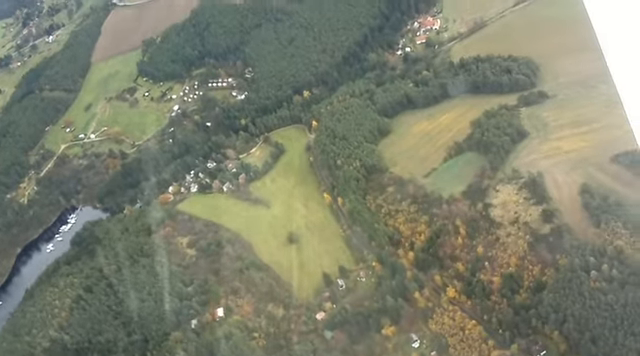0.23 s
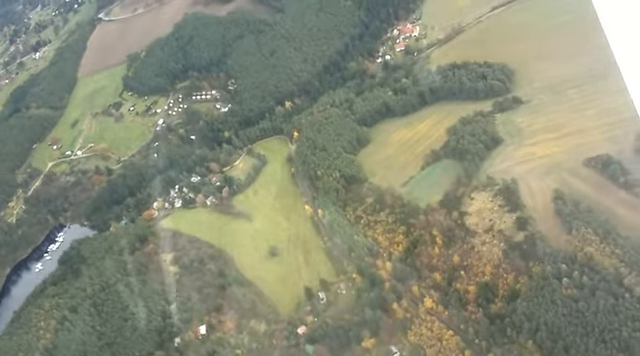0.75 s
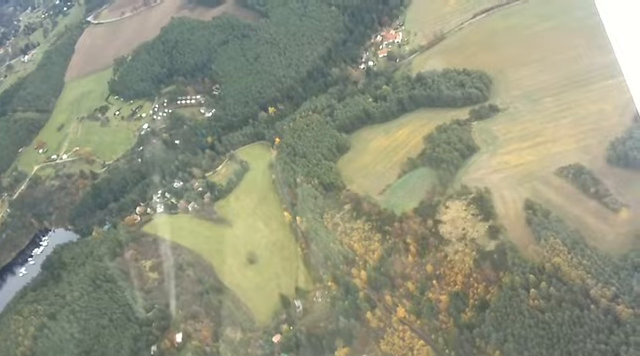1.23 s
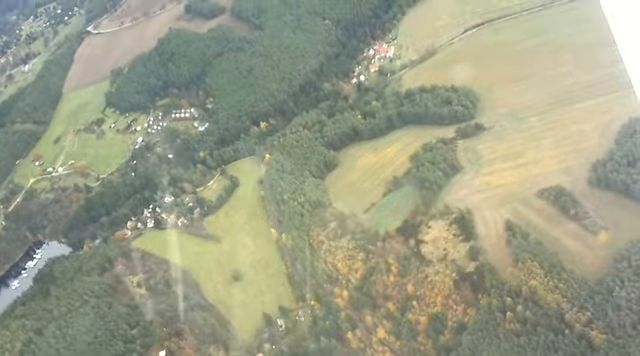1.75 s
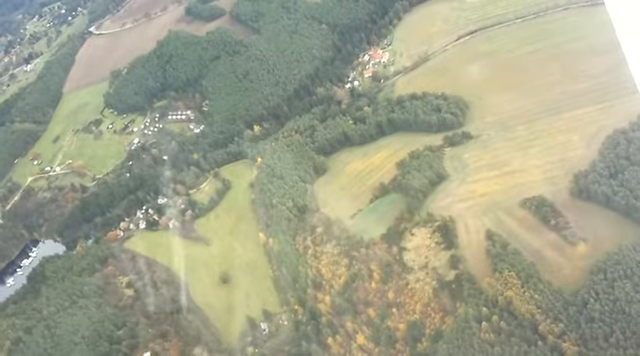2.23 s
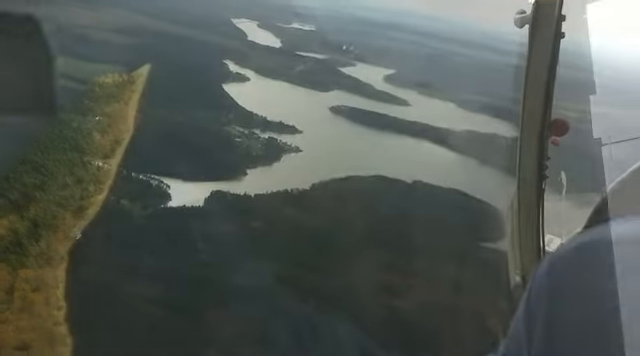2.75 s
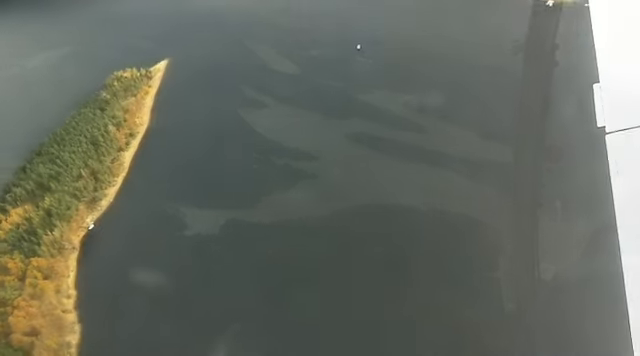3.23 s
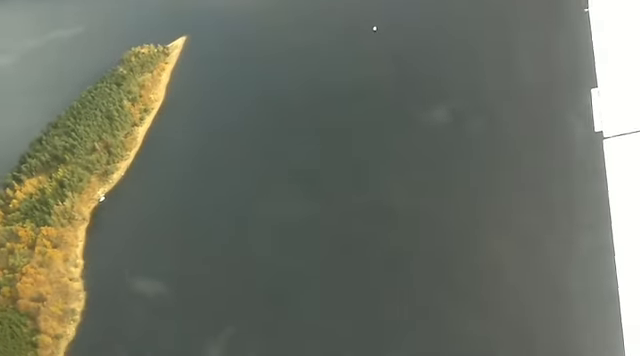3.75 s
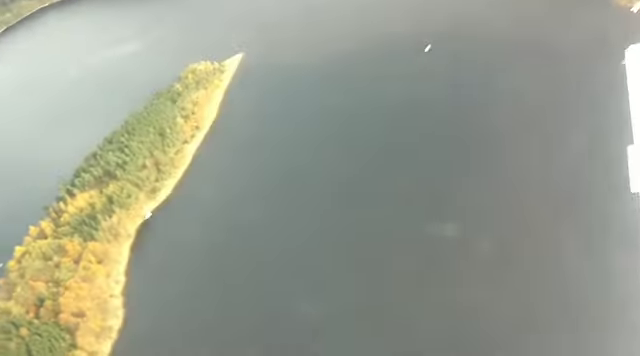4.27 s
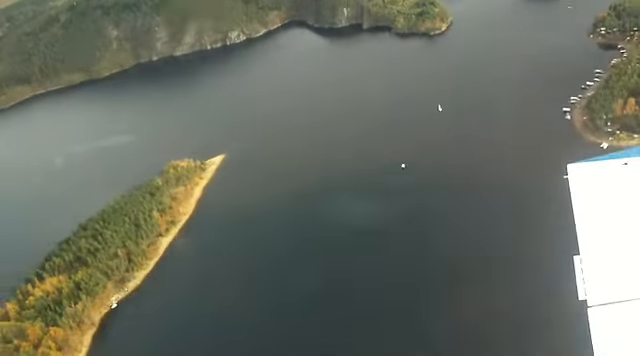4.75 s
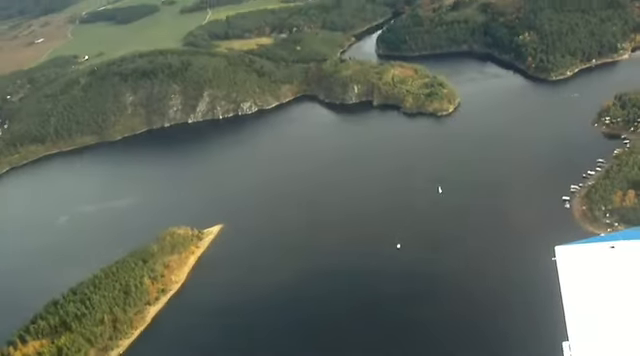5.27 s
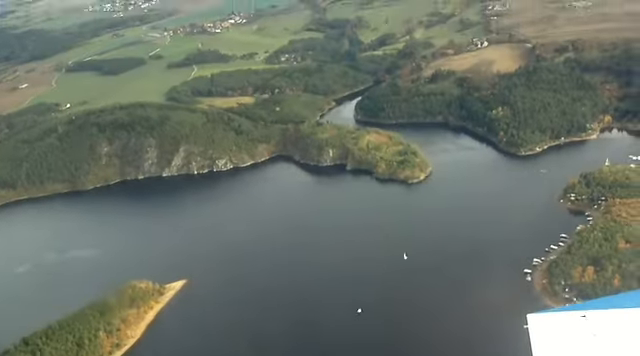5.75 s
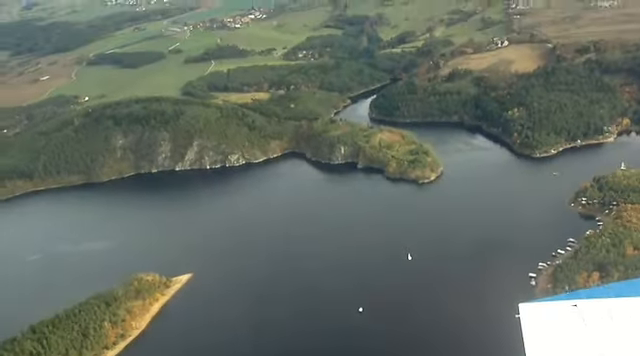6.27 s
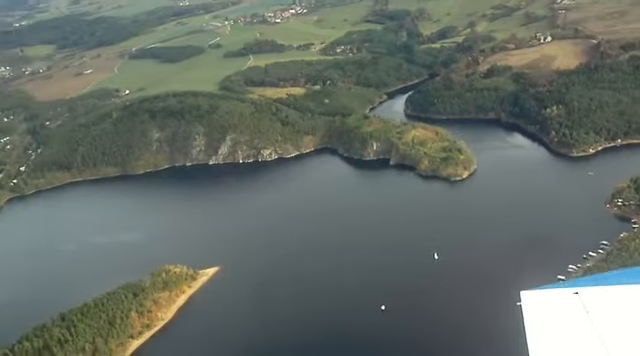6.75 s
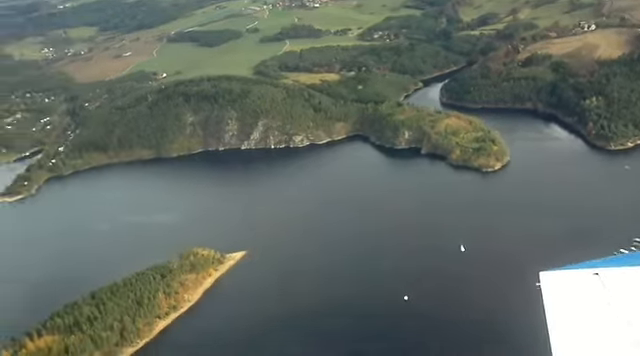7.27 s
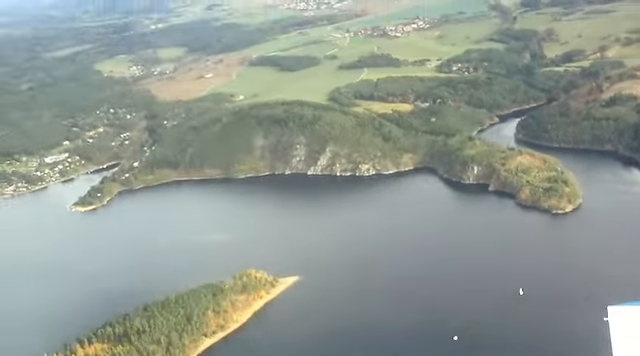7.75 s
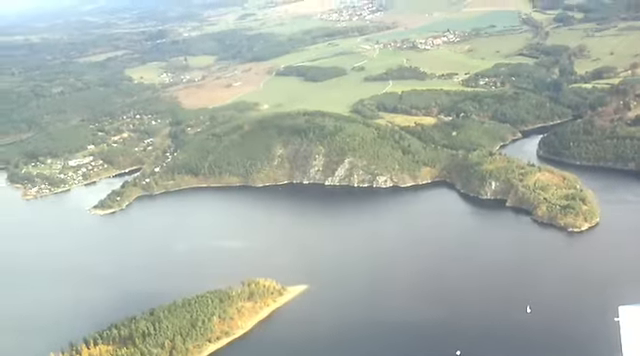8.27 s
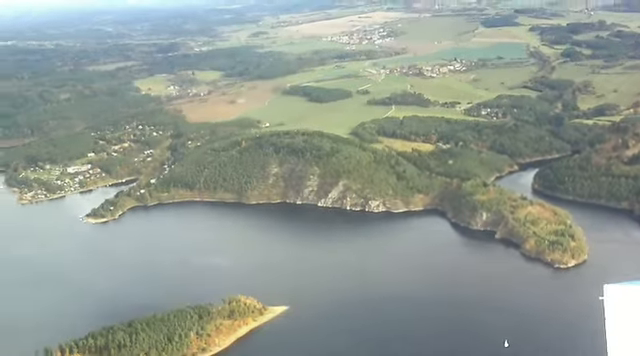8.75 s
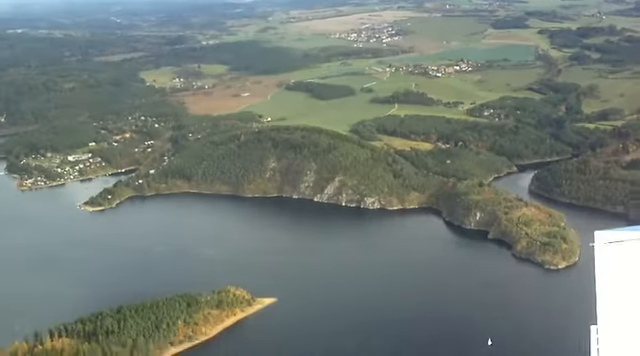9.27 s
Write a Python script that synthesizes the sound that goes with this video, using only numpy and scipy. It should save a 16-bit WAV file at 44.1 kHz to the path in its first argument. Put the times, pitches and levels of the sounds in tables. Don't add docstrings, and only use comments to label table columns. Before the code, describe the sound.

Inside a small piston aircraft in cruise, a firm low engine hum sits over airframe rumble and rushing slipstream. At about two and a third seconds it cuts off sharply. After a brief near-silent gap, scrapes and a dull knock on the camera open a short, brighter burst that fades while the steady drone swells back. The air rush then brightens, finally dulling. Close, slightly overdriven small microphone.

```python
import sys
import numpy as np
from scipy import signal
from scipy.fft import rfft, irfft, next_fast_len
from scipy.io import wavfile
from scipy.ndimage import uniform_filter1d, minimum_filter1d

SR = 44100
rng = np.random.default_rng(int(sys.argv[2]) if len(sys.argv) > 2 else 0)


def inscribe(sig):
    pcm = np.round(np.clip(np.atleast_2d(sig).T, -1, 1) * 32767)
    wavfile.write(sys.argv[1], SR, pcm.astype(np.int16))


def volts_from_db(level):
    exponent = np.asarray(level, float) / 20
    return 10 ** exponent


N = 419391
TIME = np.arange(N) / SR
CUT_S, INSERT_S, FADE_IN_S, FADE_OUT_S = 2.3635, 2.5585, 0.86, 0.57
SMEAR_S = 0.019

SPEED_LATER = [(3.1, 121.7), (9.5, 121.5)]


def unit(x):
    return x / np.sqrt(np.mean(x ** 2))


def walk(rate_hz):
    hold = max(int(SR / 32 / rate_hz), 1)
    ticks = N // 32 + 2
    held = np.repeat(rng.standard_normal(ticks // hold + 1), hold)
    slewed = uniform_filter1d(uniform_filter1d(held, hold), hold)[:ticks]
    return np.interp(TIME, np.arange(ticks) * 32 / SR, unit(slewed))


def coloured(points):
    size = next_fast_len(N)
    hz = np.arange(1, size // 2 + 2) * SR / size
    points_hz, points_db = np.transpose(points)
    shape = volts_from_db(np.interp(np.log(hz), np.log(points_hz), points_db, left=-90, right=-90))
    lines = rfft(rng.standard_normal(size)) * shape
    return hz, lines / np.sqrt(np.mean(shape ** 2))


def bands(points, edges_hz):
    hz, lines = coloured(points)
    for row in np.eye(len(edges_hz)):
        weight = np.interp(np.log(hz), np.log(edges_hz), row)
        yield irfft(lines * weight, next_fast_len(N))[:N]


def engine(cycle_rad, orders, lag_rad):
    out = 0
    twist_rad = 0.29 * walk(1.5)
    for k, db in orders:
        loose = {6: 0.08, 16: 0.5}.get(k, 1)
        start_rad = lag_rad + np.pi * (k < 6) + (k - 6) * twist_rad
        level = np.sqrt(2) * volts_from_db(db + 2.16 * loose * walk(4.0))
        out = out + level * np.sin(k * cycle_rad + start_rad + 0.59 * loose * walk(3.5))
    return out


def slipstream(cycle_rad, colour, facing):
    throb_orders = [(1, .02), (2, .035), (3, .035), (6, .04)]
    # band_hz, gain_db
    canopy = [(1500, 1.14), (3600, 3.5), (5200, 0.7), (6800, 1.1), (8600, 3.5), (10000, 0.5), (13200, -2.5),
              (15200, 3)]
    gust_db = 0.32 * walk(10.0) + 0.46 * walk(60.0) + 0.91 * walk(130.0)
    throb = 1 + sum(depth * np.cos(k * cycle_rad + k) for k, depth in throb_orders)
    edges_hz, tilts_db = np.transpose(canopy)
    air = 0
    for part, tilt_db in zip(bands(colour, edges_hz), tilts_db):
        flicker_db = 0.88 * walk(14.0)
        air = air + part * volts_from_db((facing - 1) * tilt_db + gust_db + flicker_db)
    return throb * air


def airframe():
    # freq_hz, density_db_per_hz
    rumble_colour = [(12, -33.5), (20, -15), (30, -6), (45, -5), (70, -1.5), (110, -2), (170, -1),
                     (230, -5), (300, -8.5), (400, -11), (520, -17), (700, -25.5)]
    return sum(part * volts_from_db(0.72 * walk(6.0)) for part in bands(rumble_colour, [40, 150, 400]))


def cabin(speed, orders, colour, rumble_db, rush_db, facing=1, lag_rad=0):
    firing_hz = np.interp(TIME, *np.transpose(speed))
    cycle_rad = np.cumsum(firing_hz) * (2 * np.pi / 6 / SR)
    rumble = volts_from_db(rumble_db + (facing - 1) * 0.1) * airframe()
    rush = volts_from_db(rush_db + 1.14) * slipstream(cycle_rad, colour, facing)
    return engine(cycle_rad, orders, lag_rad) + rumble + rush


def first_take():
    # time_s, firing_hz
    speed = [(0.1, 121.5), (2.33, 122)]
    # cycle_multiple, level_db
    orders = [(2, -30), (3, -27), (4, -27), (5, -44), (6, -10.5), (7, -54), (8, -27.5), (9, -29), (10, -33),
              (12, -33), (15, -36), (16, -33.5), (18, -35.5), (21, -41)]
    # freq_hz, density_db_per_hz
    rush_colour = [(260, -15), (450, -14.5), (750, -8.5), (930, -8), (1270, -11.5), (1480, -9.5),
                   (1850, -11.5), (2130, -9.5), (2450, -17.5), (3300, -24), (7800, -28), (9300, -34.5),
                   (12000, -36.5), (15700, -44)]
    return cabin(speed, orders, rush_colour, rumble_db=-16, rush_db=-29.5)


def insert_take():
    # cycle_multiple, level_db
    orders = [(3, -22), (4, -16), (6, -18.5), (8, -25), (9, -18.5), (12, -26), (16, -29), (18, -37)]
    # freq_hz, density_db_per_hz
    rush_colour = [(260, -45), (450, -19.5), (538, -3), (692, -3), (975, -12.5), (1160, -7.5), (1870, -11),
                   (1990, -15.5), (4250, -19), (9000, -26.5), (15700, -45)]
    rise_db = 6 * np.clip(TIME - INSERT_S, 0, FADE_OUT_S)
    return cabin(SPEED_LATER, orders, rush_colour, rumble_db=-16, rush_db=-27 + rise_db, lag_rad=2.2)


def last_take():
    # cycle_multiple, level_db
    orders = [(2, -32), (3, -29), (4, -27), (5, -31), (6, -10), (7, -38), (8, -25), (9, -29), (10, -29),
              (12, -48), (15, -38), (16, -31), (18, -39), (21, -41)]
    # freq_hz, density_db_per_hz
    rush_colour = [(260, -32), (500, -8.5), (880, -4.5), (1230, -7), (1480, -4), (1620, -3), (1800, -6.5),
                   (2100, -9), (2970, -17.5), (4370, -19.5), (8500, -28), (13300, -36), (14600, -34.5),
                   (15700, -38)]
    # time_s, facing_0_1
    swing = [
        (3.4, 0.1),
        (4.2, 0.23),
        (5.4, .99),
        (8.2, 1),
        (9.5, 0.2),
    ]
    facing = np.interp(TIME, *np.transpose(swing))
    return cabin(SPEED_LATER, orders, rush_colour, rumble_db=-16.5, rush_db=-28, facing=facing)


def knocks():
    # start_s, length_s, level_db, swell_db, crack_hz
    hits = [
        (2.559, 0.015, -24, 3.5, 2980),
        (2.568, 0.0087, -20.5, -2, 1500),
        (2.584, .012, -26, -3, 3000),
        (2.61, .025, -34, -1.1, 4500),
        (2.672, 0.0073, -34, -3, 3500),
    ]
    # freq_hz, level_db, t60_s
    case_modes = [(370, 1, 0.05), (1000, -1, .03), (1500, 6, .022), (2350, 1, 0.018), (4260, -6, .015)]
    out = np.zeros(N)
    t = TIME[:4096]
    ring = sum(volts_from_db(db) * np.sin(2 * np.pi * hz * t) * 1000. ** (-t / t60_s) for hz, db, t60_s in case_modes)
    for start_s, length_s, db, swell_db, crack_hz in hits:
        noise = rng.standard_normal(len(t))
        burst = noise * volts_from_db(swell_db * t / length_s) * (t < length_s)
        band_hz = [0.11 * crack_hz, 1.63 * crack_hz]
        crack = signal.lfilter(*signal.butter(2, band_hz, "band", fs=SR), burst)
        ring_gain = volts_from_db(-27 - 5 * np.log2(crack_hz / 2000))
        i = int(start_s * SR)
        out[i:i + len(t)] += volts_from_db(db + 3.5) * (crack + ring_gain * np.convolve(burst, ring)[:len(t)])
    return out


def treble_gate(x):
    # freq_hz, threshold_db re neighbouring treble
    threshold = [(3500, -18), (5500, -6), (9000, -3.4), (11000, -1.8), (13000, -.6), (16000, -.1)]
    hz, _, cells = signal.stft(x, SR, "hann", 2048)
    power = np.abs(cells) ** 2
    patch = uniform_filter1d(uniform_filter1d(power, size=5, axis=1), size=4, axis=2)
    around = uniform_filter1d(power, size=150, axis=1)
    smooth = uniform_filter1d(around, size=5, axis=2)
    around = np.minimum(smooth, 2 * minimum_filter1d(around, size=3, axis=2))
    floor = volts_from_db(np.interp(hz, *np.transpose(threshold), left=-60))[:, None] ** 2 * around
    kept = cells * (patch > floor) * (hz < 15730)[:, None]
    return signal.istft(kept, SR, "hann", 2048)[1][:, :N]


def scene():
    after_s, since_s = TIME - CUT_S, TIME - INSERT_S
    smear = volts_from_db(-13) * np.clip(1.4 - after_s / SMEAR_S, 0, 1) * (after_s < SMEAR_S)
    first_gain = uniform_filter1d(np.where(after_s < 0, 1, smear), size=20)
    insert_gain = np.clip(since_s / 0.00095, 0, 1) * np.clip(1 - since_s / FADE_OUT_S, 0, 1)
    last_gain = np.clip((after_s - SMEAR_S / 2) / FADE_IN_S, 0, 1)
    mix = first_gain * first_take()
    mix += insert_gain * insert_take()
    mix += last_gain * last_take()
    return (mix + knocks())[None]


def roll_off(x):
    return signal.sosfilt(signal.butter(12, 16110, fs=SR, output="sos"), x)


def record(dry):
    drive = 0.7
    loud = np.clip(np.tanh(drive * dry) / drive * volts_from_db(0.57), -1, 1)
    return roll_off(treble_gate(loud))


dry = scene()
out = record(dry)
inscribe(out)
```